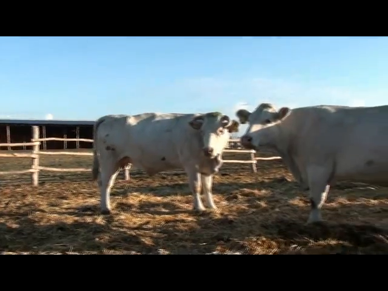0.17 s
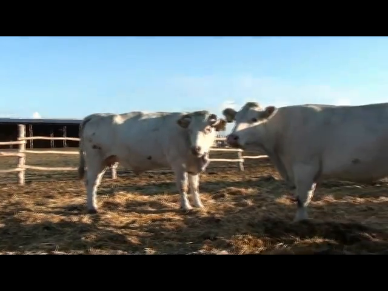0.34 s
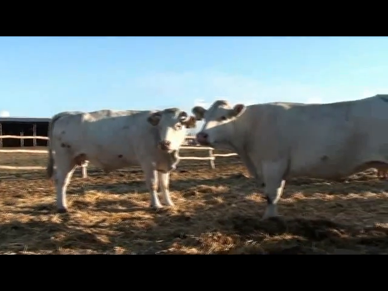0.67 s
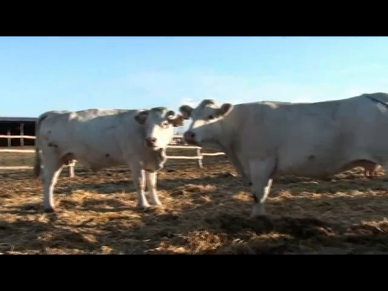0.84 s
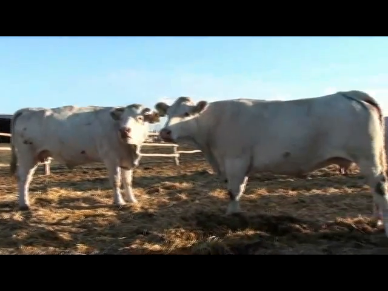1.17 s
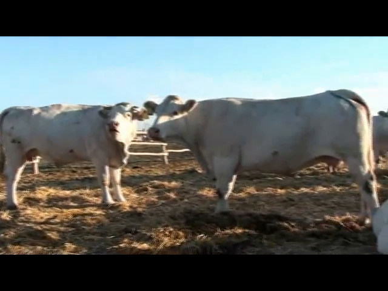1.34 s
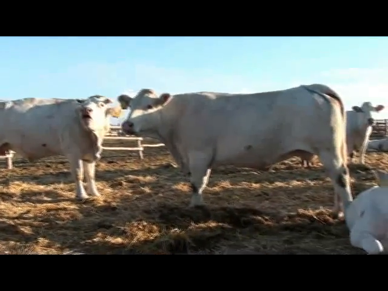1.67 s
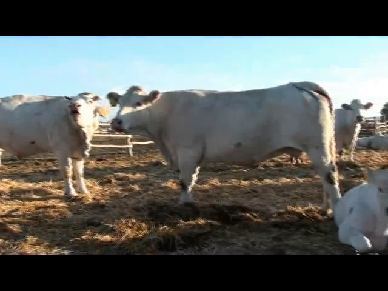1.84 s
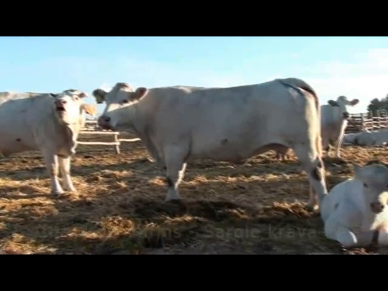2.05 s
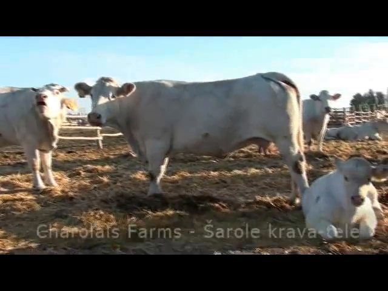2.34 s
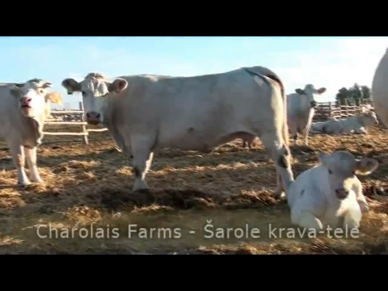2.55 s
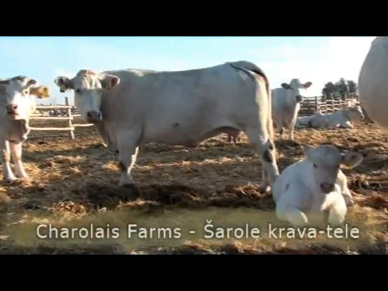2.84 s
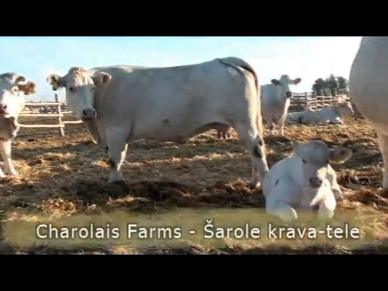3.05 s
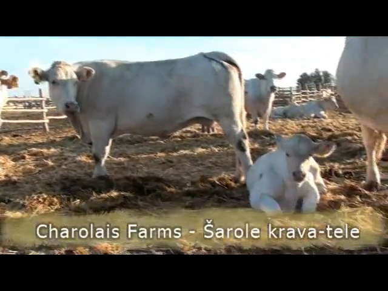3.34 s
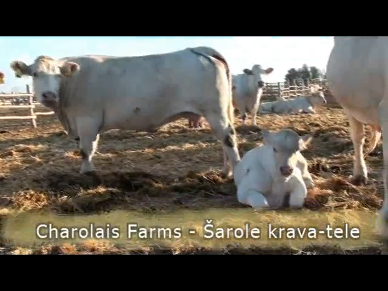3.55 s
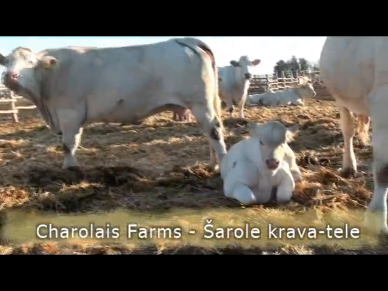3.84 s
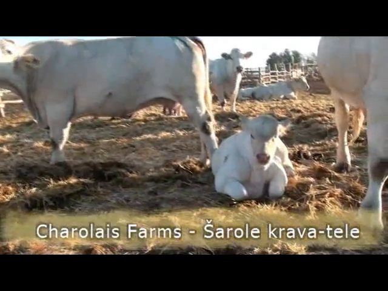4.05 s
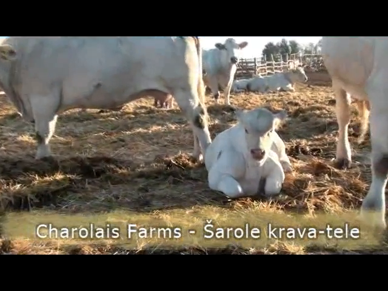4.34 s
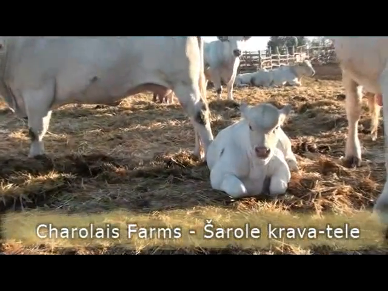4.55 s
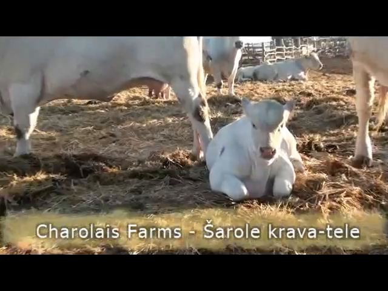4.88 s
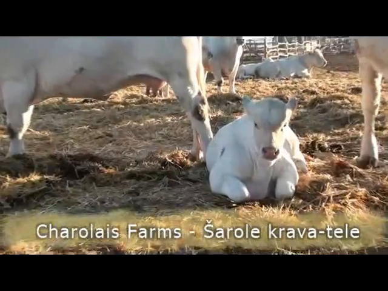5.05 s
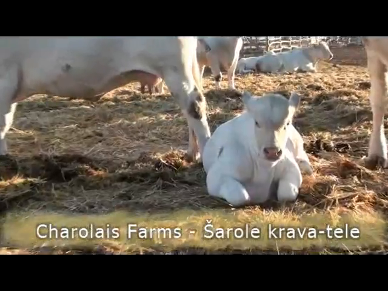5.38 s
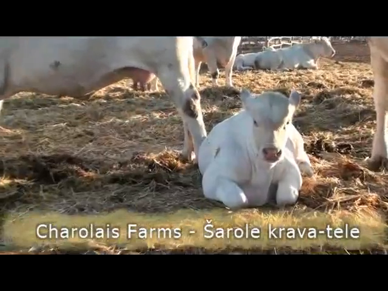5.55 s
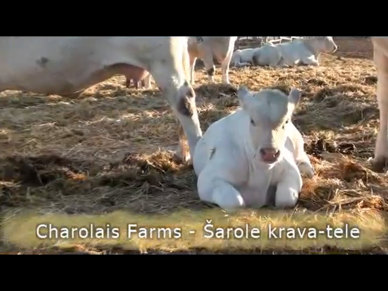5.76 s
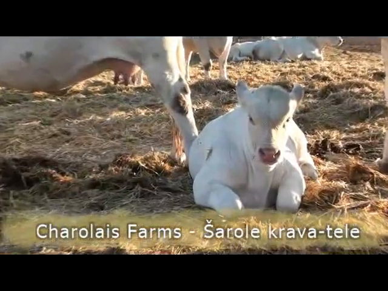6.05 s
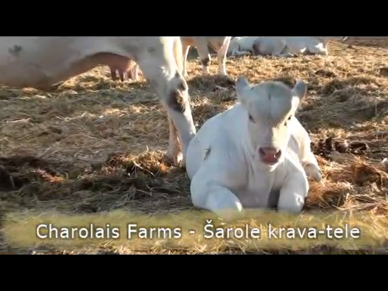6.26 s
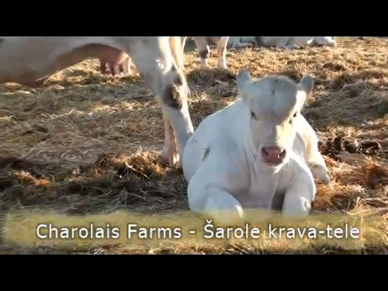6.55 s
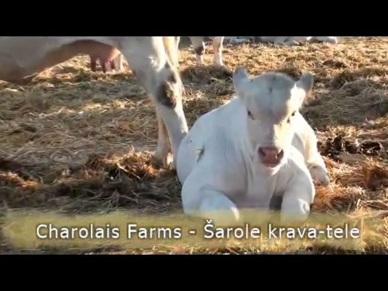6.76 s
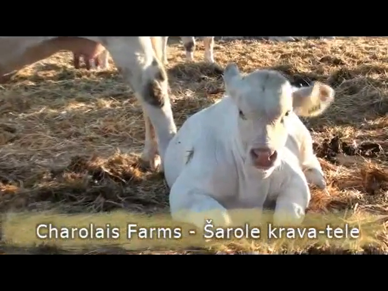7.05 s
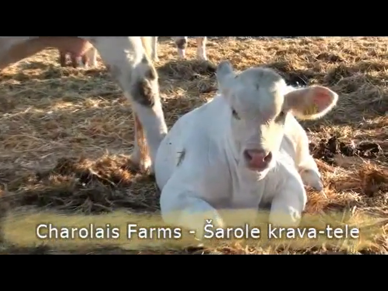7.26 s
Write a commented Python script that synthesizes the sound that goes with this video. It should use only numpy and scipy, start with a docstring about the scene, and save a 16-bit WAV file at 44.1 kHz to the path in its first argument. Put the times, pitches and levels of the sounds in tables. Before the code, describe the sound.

The tail of a cow's call is cut off at once, then comes a short grumble. A long moo climbs out of a creak, a second, slowly rising moo begins beneath it, and a bellow bursts in as that one ends. After a gap of open air, a low creaky moo closes. Breezy hiss, faint far engine and a few straw ticks surround it; small outdoor microphone, fairly close, slight dull shed echoes.

```python
"""Cattle mooing in a farm yard

Six moos follow one another, some beginning under the one before; the first is only the end of a call.
Source and filter: larynx pulses and turbulence ring the throat, while the mouth glides between shapes.
A far engine idles (unsteady sine orders), straw ticks (short noise bursts), the open air rumbles and hisses
(shaped noise), and the sheds return dull echoes (decaying noise responses)."""
import sys
import numpy as np
from scipy import signal
from scipy.fft import rfft, irfft
from scipy.io import wavfile
from scipy.ndimage import uniform_filter1d

SR = 44100
rng = np.random.default_rng(int(sys.argv[2]) if len(sys.argv) > 2 else 0)


def to_wav(sig):
    """Store sig (one row per channel, or 1-D mono) as 16-bit WAV at the path in sys.argv[1].

    Samples outside -1..1 are clipped; the rate is SR.
    """
    pcm = np.clip(np.atleast_2d(sig), -1, 1) * 32767
    pcm = np.round(pcm).astype(np.int16)
    wavfile.write(sys.argv[1], SR, pcm.T)  # frames by channels


N = 327222
TIME = np.arange(N) / SR

# the voice cracks briefly at the top of the rise; the chest tone starts this far below its held level
CRACK_S, CHEST_DEPTH_DB = 0.068, 20.5
# the nose booms as the second harmonic passes through
NASAL_HZ, NASAL_WIDTH_HZ = 230, 8.9
# the call dies ever faster, the chest last
RELEASE_DB, MOUTH_RELEASE_BEND, CHEST_RELEASE_BEND = 40, 3.25, 10.2
# as the mouth closes the rasp is favoured and the chest dips slightly halfway
CLOSING_CHEST_DB, CLOSING_RASP_DB = -1, 15.5
# the voice tires just before the release
TIRING_DB, TIRING_S = 1, 0.19
# the slackening folds turn rough, and rough folds beat in strong and weak cycles
SLACK_ROUGHNESS, SLACK_S = .32, .08
ALTERNATE_ABOVE, ALTERNATE_SHARE = .1, .75

# Course of each call, as the arguments of effort(); levels are before the call's own level_db.
# pitch rows: time_s, pitch_hz (up to the release). Others: release_s, fall_octaves_per_s, pan_db,
# mouth_db, chest_db, rasp_db (held levels), depth_db, rise_s, chest_rise_s, bend, grow_db_per_s, nasal_db,
# creak_at_s, creak_s, creak_db, crack_db, strain_at_s, strain_s, strain_chest_db,
# clean (basic roughness, 0-1), creaky, cracked, strained (roughness added in those stages)
# the end of a call
LAST_GASP = dict(pitch=[(0, 141), (.04, 138)],
             release_s=.095, fall_octaves_per_s=5, pan_db=-3.8, mouth_db=-21, depth_db=0, rise_s=.03, chest_db=-27, chest_rise_s=.06, rasp_db=-38, clean=.13)
# a short grumble
GRUMBLE = dict(pitch=[(0, 148.4), (.08, 165.6), (.12, 166.4), (.2, 176.5), (.24, 206.6), (.33, 219),
           (.41, 218), (.5, 205.5), (.56, 202.5)],
           release_s=.06, fall_octaves_per_s=2.8, pan_db=-4.2, mouth_db=-28, depth_db=3, rise_s=.35, chest_db=-26.5, chest_rise_s=.01, rasp_db=-48, strain_at_s=.22, strain_s=.04, strain_chest_db=-4, clean=.11, strained=.55)
# a long moo that climbs out of a creak
LONG_MOO = dict(pitch=[(0.73, 59.8), (0.978, 73.9), (1.178, 86.1), (1.278, 95.5), (1.482, 114.2),
            (1.574, 122.0), (1.75, 131.7), (1.978, 135.7), (2.3, 136.8), (2.36, 133.1)],
            release_s=.105, fall_octaves_per_s=3.4, pan_db=2.3, mouth_db=-19.5, depth_db=22, rise_s=.53, chest_db=-28.5, chest_rise_s=.68, nasal_db=7, rasp_db=-34.5, creak_at_s=.96, creak_s=.11, creak_db=14, crack_db=1.5, strain_at_s=1.95, strain_s=.3, strain_chest_db=4, clean=.05, cracked=.07, strained=.17)
# a moo of slowly rising pitch
RISING_MOO = dict(pitch=[(1.78, 86.9), (2.0, 98.1)] + [(2.2, 106.4), (2.346, 109.8), (2.894, 121.0),
              (3.104, 129.3), (3.216, 135.4), (3.674, 155.9), (3.804, 160.0), (4.046, 157.9),
              (4.09, 150.4)],
              release_s=.11, fall_octaves_per_s=6.5, pan_db=-1.7, mouth_db=-15.8, depth_db=18, rise_s=1.6, bend=2.1, chest_db=-26.5, chest_rise_s=.4, nasal_db=1.5, rasp_db=-41, creak_at_s=2.4, creak_s=.35, creak_db=5, clean=.05, creaky=.07)
# a bellow that leaps late and keeps growing
BELLOW = dict(pitch=[(3.6, 74.4), (3.9, 95.1)] + [(4.18, 119.6), (4.3, 126.8), (4.404, 131.6),
          (4.504, 132.7), (4.604, 136.6), (4.878, 139.5), (5.05, 135.5), (5.1, 127.3)],
          release_s=.1, fall_octaves_per_s=7, pan_db=2.7, mouth_db=-16.8, depth_db=26, rise_s=.56, bend=.33, grow_db_per_s=4, chest_db=-32.5, chest_rise_s=.6, rasp_db=-39.5, creak_at_s=3.75, creak_s=.3, creak_db=22, crack_db=2.5, clean=.018, creaky=.03, cracked=.17)
# a low, creaky moo
CREAKY_MOO = dict(pitch=[(6.62, 66.3), (6.738, 73.8), (6.852, 80.0), (6.952, 84.0), (7.168, 90.0),
              (7.42, 95.7)] + [(7.7, 98)],
              release_s=.1, fall_octaves_per_s=5, pan_db=-2, mouth_db=-18.5, depth_db=36, rise_s=.75, bend=4.2, chest_db=-29, chest_rise_s=.3, rasp_db=-31, creak_at_s=6.95, creak_s=.22, creak_db=11, strain_at_s=7.32, strain_s=.25, strain_chest_db=4, clean=.09, strained=.26)

# Mouth shapes: the throat's resonances, in the same order within a call.
# Columns: centre_hz, width_hz, level_db
# the gasp
GASP = [(198, 65, 19), (490, 220, 1.5), (816, 116, 3.5), (1360, 270, 2), (2474, 420, -7), (3540, 150, -21),
        (5770, 790, -35), (7860, 427, -34)]
# the grumble, from hum to growl
HUM = [(168, 49, 13.5), (485, 192, -23), (760, 210, -27), (1080, 110, -16), (1680, 210, -13.5),
       (2210, 792, -20.5), (4370, 1411, -27), (6740, 2400, -18)]
GROWL = [(197, 190, 0), (445, 96, -5.5), (810, 145, -4), (1086, 200, -4.5), (1560, 880, -5.5),
         (2190, 740, -5.5), (4121, 1100, -19), (6630, 3300, -13)]
# the long moo, from creak to pressed voice
LONG_CREAK = [(108, 160, -6), (491, 210, -12), (734, 240, -1), (1430, 330, -7), (1624, 116, 4.5),
              (1950, 200, -5), (2600, 260, -1), (3300, 270, -8), (4100, 540, -21), (5800, 1232, -27),
              (6860, 550, -26), (7650, 1900, -26)]
LONG_OPENING = [(147, 58, -3), (523, 370, -11.5), (736, 142, 10), (1180, 230, -10.5), (1480, 130, 2),
                (1887, 120, 11), (2455, 99, -3.5), (2960, 540, -29), (4243, 520, -45), (5516, 980, -48),
                (6715, 950, -38), (8277, 1900, -47)]
LONG_WIDE = [(201, 32, 6), (605, 240, -8), (812, 86, 2), (900, 460, -10.5), (1474, 81, -5.5),
             (1756, 154, -6.5), (2390, 190, -8.5), (3050, 400, -40), (4320, 905, -55), (5500, 760, -39),
             (6950, 700, -35), (8900, 3700, -51)]
LONG_HELD = [(189, 43, 2), (552, 140, -3), (770, 120, 1), (1204, 220, -12), (1432, 175, -3),
             (1752, 110, -1), (2440, 280, -4), (2930, 2100, -64.5), (4456, 610, -49), (5150, 670, -33),
             (7150, 2300, -38), (9800, 9200, -51)]
LONG_PRESSED = [(178, 62, -3.5), (514, 193, -3.5), (795, 230, -9), (1163, 82, -4.5), (1428, 160, -4.5),
                (1785, 130, -6.5), (2340, 405, -9), (2989, 597, -47), (4320, 888, -54), (5300, 710, -34),
                (6700, 1200, -41.5), (9604, 1900, -45.5)]
# the rising moo, from nasal to open
RISING_NASAL = [(209, 86, 14), (496, 99, 4), (807, 205, 1), (1181, 77, 7), (1485, 350, -1.5),
                (1680, 66, -2.5), (2160, 310, -7), (2720, 100, -9), (3420, 600, -27.5), (5120, 1000, -48),
                (7400, 1700, -31.5), (7457, 470, -42)]
RISING_OPENING = [(185, 36, 12.5), (493, 280, -18), (846, 65, -13), (1207, 166, -13.5), (1406, 150, -19.5),
                  (1666, 220, -22), (2206, 180, -27), (2700, 340, -39), (3900, 1000, -61), (5900, 510, -83),
                  (7180, 930, -53.5), (9000, 3900, -61)]
RISING_OPEN = [(154, 39, -5), (500, 97, -4), (833, 160, -10.5), (1220, 210, -7.5), (1450, 99, -10),
               (1660, 220, -14.5), (1992, 126, -13.5), (2540, 880, -28), (4170, 1100, -41),
               (5865, 6700, -43), (7140, 550, -31.5), (9200, 450, -46)]
# the bellow, from onset to closing
BELLOW_ONSET = [(180, 290, -15), (520, 69, -8.5), (760, 160, -3.5), (1084, 29, -3.5), (1320, 610, -21),
                (1620, 110, -13.5), (1986, 100, -5.5), (2340, 280, -12), (2710, 185, -10), (3630, 580, -25),
                (4811, 800, -57), (6600, 1200, -31), (8900, 1500, -40)]
BELLOW_OPEN = [(197, 46, -4), (578, 70, -7.5), (835, 56, -10.5), (1158, 190, -20.5), (1374, 86, -21),
               (1640, 157, -27.5), (1966, 300, -24.5), (2340, 110, -27.5), (2685, 123, -29.5),
               (3520, 250, -46), (4700, 1800, -62), (6760, 2400, -55), (9174, 3400, -57.5)]
BELLOW_ROUND = [(165, 58, -4.5), (600.7, 61, 8), (834, 57, -7), (1162, 102, -7), (1368, 180, -13),
                (1700, 144, -14), (1960, 137, -11), (2270, 110, -17.5), (2675, 163, -15.5),
                (3450, 810, -37), (4420, 320, -37), (6050, 470, -35), (9800, 2200, -44.5)]
BELLOW_CLOSING = [(211, 85, 12), (573, 145, 8), (820, 115, 3), (1168, 81, 9.5), (1450, 140, -2),
                  (1770, 160, -0.5), (2015, 100, 3), (2380, 270, -9), (2780, 130, -17), (3650, 210, -32),
                  (4400, 740, -45), (6300, 940, -42), (8600, 2200, -46)]
# the creaky moo, from onset to full voice
CREAK_ONSET = [(132, 82, -16), (300, 630, -4.5), (650, 43, -2.5), (1534, 126, -1), (2034, 105, 3.5),
               (2620, 540, -7.5), (3330, 300, -7), (4010, 120, -0.5), (5060, 760, -15), (6350, 710, -19),
               (7840, 1700, -23), (10556, 1500, -30)]
CREAK_BRIGHT = [(141, 156, -56), (275, 760, -9.5), (644, 110, -4), (1410, 200, -3), (1966, 55, 5.5),
                (2400, 250, 2.5), (3130, 720, -15.5), (3840, 190, -17), (4500, 820, -12),
                (6070, 210, -16.5), (7760, 870, -22.5), (9670, 824, -25.5)]
CREAK_FULL = [(154, 77, -4), (288, 520, -11.5), (650, 56, -7.5), (1375, 440, -13.5), (1860, 67, -5.5),
              (2270, 81, -6.5), (2820, 1000, -22), (3370, 420, -22), (4680, 1000, -24), (6156, 711, -42),
              (7100, 1000, -32), (8640, 1300, -30)]

# Echoes from the sheds; columns: delay_s, level_db
ECHOES = [(.045, -19.5), (.11, -47), (.2, -36), (0.288, -31.5)]
# Straw ticks; columns: start_s, peak_db, centre_hz
TICKS = [(0.616, -29, 3360), (1.498, -22, 3700), (2.432, -58, 6500), (3.159, -19, 4840),
         (5.501, -38.5, 5900), (6.807, -27, 6360)]
# Orders of the far engine; columns: multiple of the firing rate, level_db (before the engine's level)
ENGINE_ORDERS = [(3, -59), (4, -61), (5, -48), (6, -79), (7, -58), (8, -73), (9, -88), (10, -49.5)]
FIRING_HZ = 24.6
# Relative spectrum of the open air; columns: frequency_hz, level_db (per Hz)
AIR_SPECTRUM = [(15, -62), (25, -38), (80, -1.5), (109, -13.5), (142, -5), (190, -9), (260, -12),
                (321, -21), (407, -22), (530, -20), (1300, -22), (2860, -30.5), (3820, -32.5), (11500, -46),
                (13500, -76)]
# Gain of the low background, which swells and sinks; columns: time_s, gain_db
RUMBLE_GAIN = [(0, 4), (2.4, 2.5), (3.4, 2), (5.1, -13), (5.25, -1), (6.3, 3.5), (7.42, 10.5)]
# Gain of the air's hiss, which rises and eases; columns: time_s, gain_db
HISS_GAIN = [(0, 3.5), (.7, 5.5), (2.4, 12), (5.2, -0.5), (5.7, -3), (7.42, 5)]
CUTOFF_HZ = 13000


def herd():
    """Succession of sources: six calls, each with the times (s) at which the mouth reaches its shapes."""
    gasp = [(0, GASP)]
    grumble = [(.19, HUM), (.25, GROWL)]
    long = [(1.09, LONG_CREAK), (1.16, LONG_OPENING), (1.23, LONG_OPENING), (1.42, LONG_WIDE),
            (1.72, LONG_HELD), (2.1, LONG_PRESSED)]
    rising = [(2.7, RISING_NASAL), (3.3, RISING_OPENING), (3.85, RISING_OPEN)]
    bellow = [(4.14, narrowed(BELLOW_ONSET, ratio=0.893)), (4.2, BELLOW_ONSET), (4.27, BELLOW_OPEN),
              (4.85, BELLOW_ROUND), (5.04, BELLOW_ROUND), (5.12, BELLOW_CLOSING)]
    creak = [(6.8, CREAK_ONSET), (7.03, CREAK_BRIGHT), (7.34, CREAK_FULL)]
    calls = moo(effort(**LAST_GASP), gasp, turbulence_hz=2490, puff_s=0.012, top_hz=8900,
                swell_s=0.00084, level_db=2.5)
    calls += moo(effort(**GRUMBLE), grumble, turbulence_hz=2510, puff_s=0.011, top_hz=9100,
                 swell_s=0.0061, level_db=2.5)
    calls += moo(effort(**LONG_MOO), long, turbulence_hz=1970, puff_s=0.007, top_hz=12800,
                 swell_s=0.032, level_db=2.33)
    calls += moo(effort(**RISING_MOO), rising, turbulence_hz=1770, puff_s=0.0039, top_hz=11400,
                 swell_s=0.022, level_db=-0.1)
    calls += moo(effort(**BELLOW), bellow, turbulence_hz=1970, puff_s=0.027, top_hz=9700,
                 swell_s=0.02, level_db=0.34)
    calls += moo(effort(**CREAKY_MOO), creak, turbulence_hz=2920, puff_s=0.018, top_hz=12600,
                 swell_s=0.046, level_db=-1.06)
    return calls


def moo(curve, shapes, turbulence_hz, puff_s, top_hz, swell_s, level_db, fade_s=0.015):
    """Band-wise effort: chest tone, mouth tone and rasp each follow their own level; the bass stays centred."""
    start, end = curve[0][0], curve[-1][0]
    span = slice(max(0, int(start * SR)), int((end + 2 * fade_s) * SR))
    t = TIME[span]
    voice = cut(larynx(curve, shapes, turbulence_hz, puff_s)[span], top_hz, "low", order=10)
    mouth_db, chest_db, rasp_db, pan_db = read(curve, t)[1:-1]
    low = cut(cut(voice, 330, "low"), 330, "low")
    high = cut(cut(voice, 330, "high"), 330, "high")
    middle = cut(cut(high, 3000, "low"), 3000, "low")
    top = cut(high, 3000, "high", order=6)
    sound = place(even(middle) * from_db(mouth_db) + even(top) * from_db(rasp_db), pan_db)
    sound += even(cut(low, 77, "high", order=3)) * from_db(chest_db)
    gate = ramp(t, start, swell_s) * np.clip((end - t) / fade_s + 1, 0, 1)
    out = np.zeros((2, N))
    out[:, span] = sound * gate * from_db(level_db)
    return out


def larynx(curve, shapes, turbulence_hz, puff_s, size=4096):
    """Glottal excitation: each closure of the folds sends a pulse and a dying turbulent puff up the throat."""
    t = TIME[(TIME >= curve[0][0]) & (TIME <= curve[-1][0])]
    pitch_hz = read(curve, t)[0] * (1 + .0007 * drift(30, t))
    cycles = np.cumsum(pitch_hz) / SR
    times = np.interp(np.arange(int(cycles[-1]) + 1), cycles, t)
    rough = read(curve, times)[-1]
    chance = rng.standard_normal((len(times), size))
    # hoarse cycles are uneven in strength and timing, and strong and weak ones take turns
    alternate = ALTERNATE_SHARE * np.maximum(rough - ALTERNATE_ABOVE, 0)
    strength = 1 + .55 * rough * chance[:, -1] + alternate * (-1) ** np.arange(len(times))
    at = np.maximum(times + .0002 * rough * chance[:, -2], 0) * SR   # in samples
    hz, age = np.fft.rfftfreq(size, 1 / SR), np.arange(size) / SR
    decay = np.exp(-age / puff_s) * np.clip(2 - 3 * age / age[-1], 0, 1)
    puff = rfft(chance * decay / np.linalg.norm(decay))
    # turbulence takes over towards the treble, and sooner in a hoarse voice
    share = rough[:, None] * (np.sqrt(hz / (hz + 400)) + (hz / turbulence_hz) ** 3)
    source = (strength[:, None] + share * puff) / np.sqrt(1 + share ** 2)
    part_sample_delay = np.exp(-2j * np.pi * hz / SR * (at % 1)[:, None])
    rings = irfft(source * throat(shapes, times, size) * part_sample_delay)
    out = np.zeros(N + 2 * size)
    for start, ring in zip(at.astype(int), rings):
        out[start:start + size] += ring
    return out[:N]


def throat(shapes, times, size):
    """Formant filtering: a causal response for each pulse, its resonances gliding between mouth shapes."""
    tables = np.array([table for s, table in shapes], float)
    shape_times = [s for s, table in shapes]
    blend = np.array([np.interp(times, shape_times, one) for one in np.eye(len(shapes))]).T
    centres = np.exp(blend @ np.log(tables[..., 0]))
    widths = np.exp(blend @ np.log(tables[..., 1]))
    gains = from_db(blend @ tables[..., 2])
    hz = np.fft.rfftfreq(size, 1 / SR)
    power = 0
    for centre, width, gain in zip(centres.T, widths.T, gains.T):
        detuning = 2 * (hz - centre[:, None]) / width[:, None]
        power = power + (gain[:, None] / (1 + detuning ** 2)) ** 2
    cepstrum = irfft(.5 * np.log(power + 1e-14))
    cepstrum[:, 1:size // 2] *= 2      # minimum phase: the throat rings only after the pulse
    cepstrum[:, size // 2 + 1:] = 0
    return np.exp(rfft(cepstrum))


def narrowed(shape, ratio):
    """Formant lowering: with the mouth less open, every resonance lies lower."""
    return [(hz * ratio, width, db) for hz, width, db in shape]


def effort(pitch, release_s, fall_octaves_per_s, pan_db, mouth_db, depth_db, rise_s, chest_db, chest_rise_s,
           rasp_db, clean, bend=1, grow_db_per_s=0, nasal_db=0, creak_at_s=0, creak_s=1, creak_db=0, creaky=0,
           crack_db=0, cracked=0, strain_at_s=0, strain_s=1, strain_chest_db=0, strained=0):
    """Vocal effort over one call: creak, rise, crack, hold, strain and release, as rows of
    time_s, pitch_hz, mouth_db, chest_db, rasp_db, pan_db (left over right), roughness."""
    start, let_go = pitch[0][0], pitch[-1][0]
    t = np.arange(start, let_go + release_s, .002)
    rise, release = ramp(t, start, rise_s), ramp(t, let_go, release_s)
    creak, crack = bell(t, creak_at_s, creak_s), bell(t, start + rise_s, CRACK_S)
    strain = ramp(t, strain_at_s - strain_s / 2, strain_s)
    hz = read(pitch, t)[0] * 2 ** (-fall_octaves_per_s * release_s * release)
    # bend over 1 rises quickly at first, under 1 leaps late
    push = -depth_db * (1 - rise) ** bend
    push += grow_db_per_s * np.maximum(t - start - rise_s, 0) + crack_db * crack
    push -= TIRING_DB * ramp(t, let_go - TIRING_S, TIRING_S)
    push -= RELEASE_DB * release ** MOUTH_RELEASE_BEND
    # creak brightens the rasp, and the crack lifts it twice as far as the mouth tone
    rasp = rasp_db + push + creak_db * creak + crack_db * crack + CLOSING_RASP_DB * release
    chest = chest_db - CHEST_DEPTH_DB * (1 - ramp(t, start, chest_rise_s)) + strain_chest_db * strain
    chest += nasal_db * bell(2 * hz, NASAL_HZ, NASAL_WIDTH_HZ)
    chest += CLOSING_CHEST_DB * np.sin(np.pi * release) - RELEASE_DB * release ** CHEST_RELEASE_BEND
    rough = clean + creaky * creak + cracked * crack + strained * strain
    rough = np.maximum(rough, SLACK_ROUGHNESS * ramp(t, let_go - SLACK_S / 2, SLACK_S))
    return np.column_stack([t, hz, mouth_db + push, chest, rasp, np.full(len(t), pan_db), rough])


def yard(x, smear_s=0.022, dull_hz=2200):
    """Diffuse reflection: sheds return dull, smeared echoes, scattered differently to each side."""
    age = TIME[:SR // 2]
    shape = sum(from_db(db) * (age >= delay) * np.exp(-np.abs(age - delay) / smear_s) for delay, db in ECHOES)
    response = rng.standard_normal((2, len(age))) * shape / np.sqrt(smear_s * SR / 2)
    return signal.fftconvolve(x, cut(response, dull_hz, "low"), axes=1)[:, :N]


def straw(decay_s=0.0068):
    """Impulsive fracture: dry stalks snap with a short, bright burst of band-limited noise."""
    out = np.zeros(N)
    age = TIME[:SR // 20]
    for start_s, peak_db, hz in TICKS:
        burst = rng.standard_normal(len(age)) * np.exp(-age / decay_s)
        snap = cut(burst, [hz / 1.07, hz * 1.26], "band", order=1)
        out[int(start_s * SR):][:len(age)] += from_db(peak_db) * snap / np.abs(snap).max()
    return out


def engine(level_db=-8.0, waver=0.01233):
    """Harmonic orders of periodic firing: an idling engine far off, its rate wavering, each order fluttering."""
    turn = 2 * np.pi * np.cumsum(FIRING_HZ * (1 + waver * drift(7.0, TIME))) / SR
    orders = np.zeros(N)
    for multiple, db in ENGINE_ORDERS:
        flutter = from_db(db + 3 * drift(8, TIME))
        orders += flutter * np.sin(round(multiple) * turn + rng.uniform(0, 1))
    return np.sqrt(2) * from_db(level_db) * orders


def air(level_db=-40.0, width=0.3, wide_hz=700):
    """Coloured noise: steady outdoor rumble and hiss, alike on both sides in the bass and wider above."""
    hz = np.fft.rfftfreq(N, 1 / SR)
    points_hz, db = np.transpose(AIR_SPECTRUM)
    colour = from_db(np.interp(np.log(hz + 1), np.log(points_hz), db))
    mid, side = rms_one(irfft(rfft(rng.standard_normal((2, N))) * colour, N))
    stereo = mid + width * cut(side, wide_hz, "high") * np.array([[1], [-1]])
    return from_db(level_db) * stereo


def from_db(db):
    """Logarithmic level: decibels to an amplitude gain."""
    return 10 ** (np.asarray(db) / 20)


def rms_one(x):
    """Energy normalisation: scale to an rms of 1."""
    return x / np.sqrt(np.mean(x ** 2) + 1e-20)


def read(rows, t):
    """Linear interpolation: each column of a curve at times t."""
    s, *columns = np.transpose(rows)
    return [np.interp(t, s, c) for c in columns]


def cut(x, hz, kind, order=2):
    """Band limitation by a Butterworth filter."""
    return signal.sosfilt(signal.butter(order, hz, kind, fs=SR, output="sos"), x)


def drift(rate, t):
    """Slow fluctuation: lines joining random points of unit spread, rate points a second."""
    return np.interp(t * rate, np.arange(4096), rng.standard_normal(4096))


def place(x, pan_db):
    """Lateralisation: mono to stereo by a level difference."""
    return x * from_db(np.array([[.5], [-.5]]) * pan_db)


def even(x, window_s=0.03):
    """Envelope flattening: divide out the slow level, leaving the single pulses standing."""
    size = int(window_s * SR)
    slow_power = uniform_filter1d(uniform_filter1d(x * x, size), size)
    return x / np.sqrt(np.abs(slow_power) + 1e-14)


def bell(x, centre, width):
    """Gaussian weighting: a smooth hump of height 1."""
    return np.exp(-((x - centre) / width) ** 2)


def ramp(t, start, length):
    """Linear onset: from 0 to 1 in a straight line, then held."""
    return np.clip((t - start) / length, 0, 1)


def scene(rumble_hz=300):
    """Superposition: the herd with its echoes over the sounds of the yard."""
    calls, outdoors = herd(), air()
    rumble = cut(outdoors, rumble_hz, "low", order=3) + engine()
    hiss = cut(outdoors, rumble_hz, "high", order=3)
    background = rumble * from_db(read(RUMBLE_GAIN, TIME)[0]) + hiss * from_db(read(HISS_GAIN, TIME)[0])
    return calls + yard(calls) + straw() + background


def record(dry):
    """Band limit of a small microphone: an elliptic filter cuts the top steeply."""
    return signal.sosfilt(signal.ellip(8, .2, 80, CUTOFF_HZ, fs=SR, output="sos"), dry)


dry = scene()
out = record(dry)
to_wav(out)
```